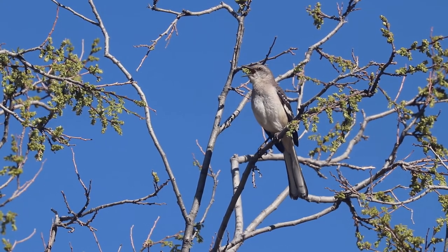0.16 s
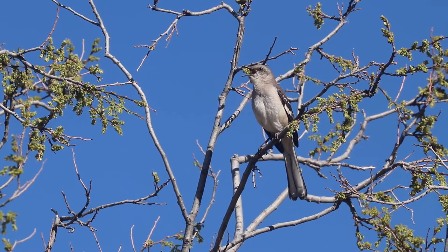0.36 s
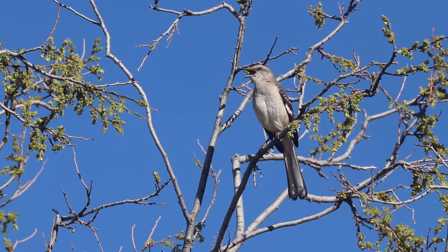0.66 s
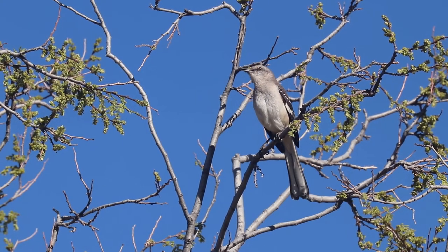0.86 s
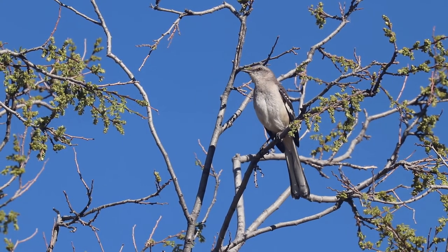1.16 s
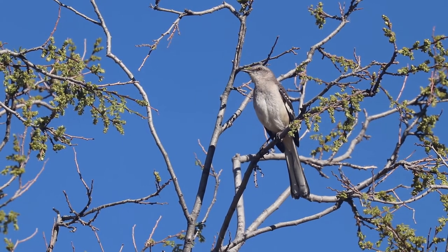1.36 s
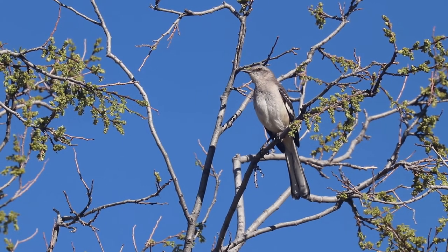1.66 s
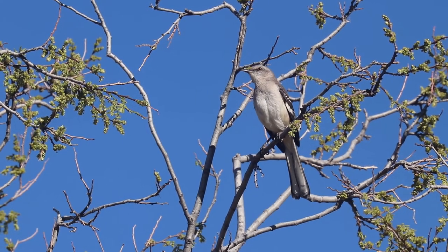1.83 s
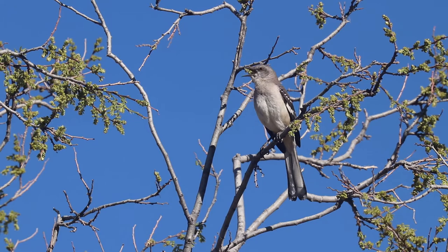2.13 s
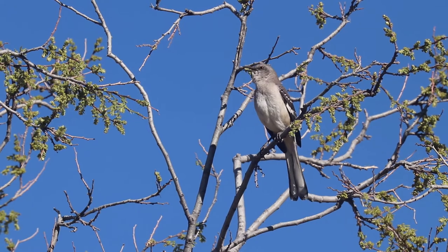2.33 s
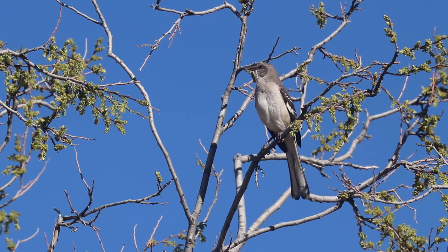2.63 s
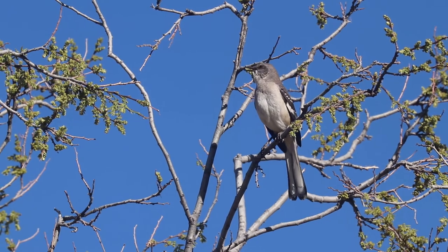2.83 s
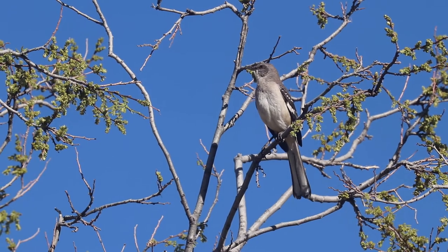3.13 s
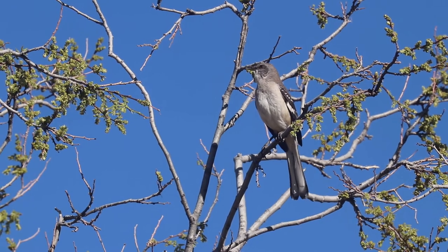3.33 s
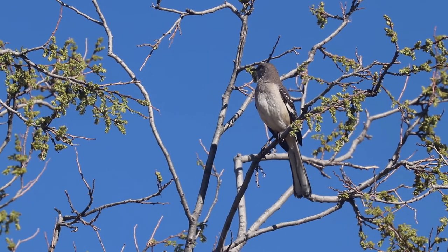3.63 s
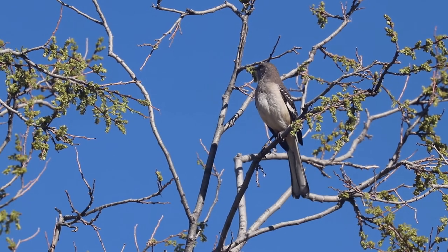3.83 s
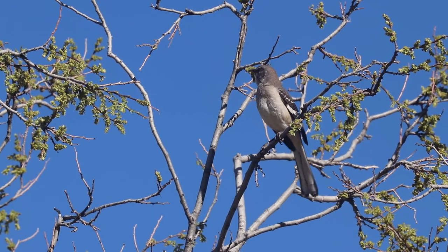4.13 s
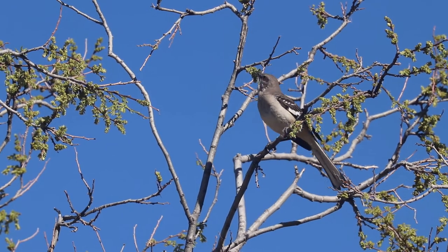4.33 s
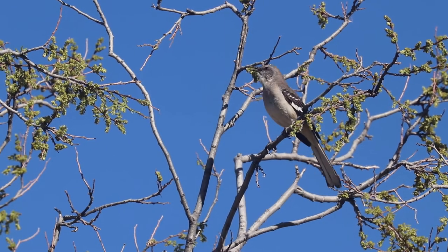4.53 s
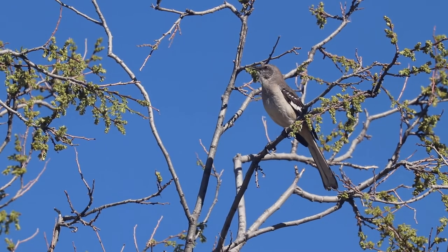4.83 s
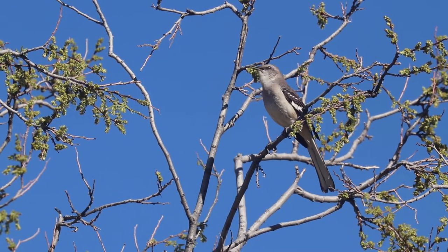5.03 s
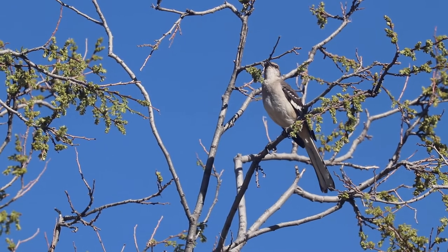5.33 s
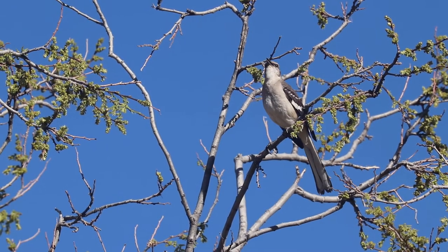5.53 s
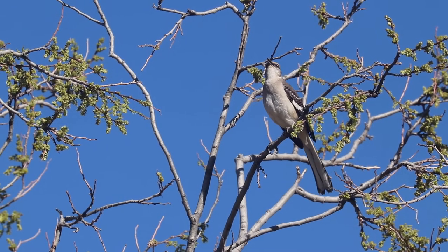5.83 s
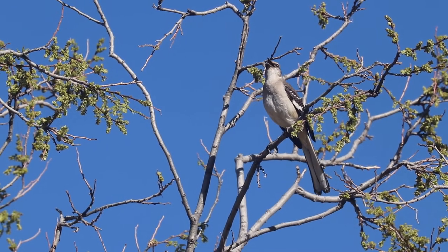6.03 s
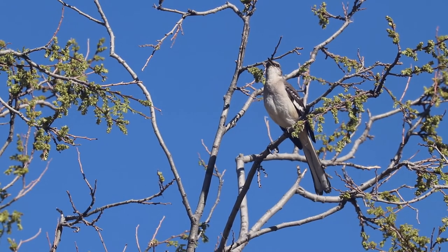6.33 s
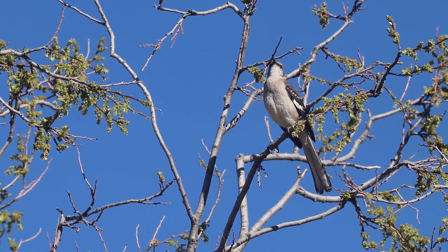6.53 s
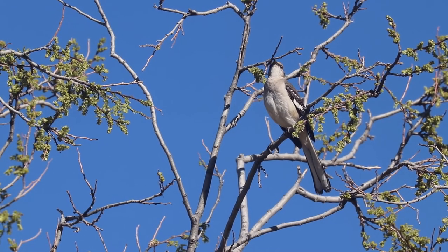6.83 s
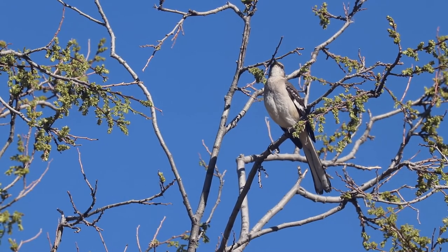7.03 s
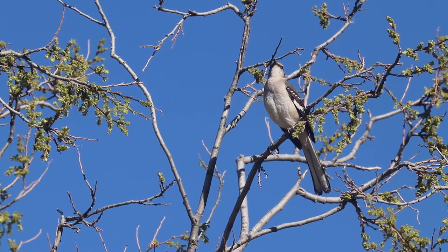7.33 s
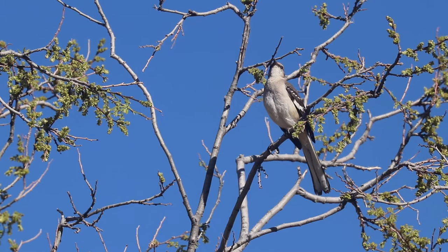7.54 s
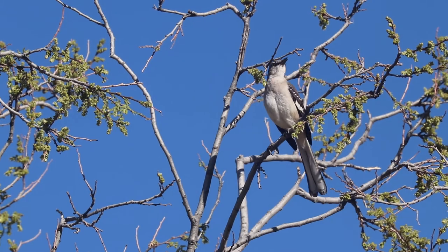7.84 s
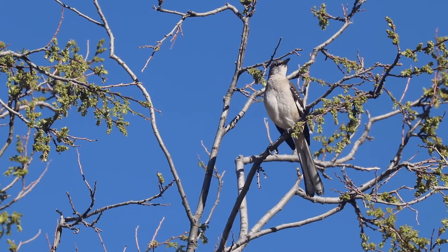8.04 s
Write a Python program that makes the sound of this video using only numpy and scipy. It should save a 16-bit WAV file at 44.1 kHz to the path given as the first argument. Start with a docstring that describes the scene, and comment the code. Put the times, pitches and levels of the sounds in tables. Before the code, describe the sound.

Clear mockingbird song changes from phrase to phrase with short pauses, heard on the left in still open air with a faint echo.

```python
"""Mockingbird in a canyon

A mockingbird's syrinx bends near-pure tones into loops, slurs, chucks, sweeps, trills and whistles,
and flutters them into buzzes. Branches scatter the song and a far canyon wall returns it faintly,
over still air and an opening puff of wind. One microphone feeds the left channel;
the right carries only the recorder's hiss."""
import sys
import numpy as np
from scipy import signal
from scipy.fft import rfft, irfft
from scipy.io import wavfile
from scipy.ndimage import uniform_filter1d

SR = 44100
rng = np.random.default_rng(int(sys.argv[2]) if len(sys.argv) > 2 else 0)


def unload_wav(signal):
    """Save mono or channel-first audio to the path in sys.argv[1] as 16-bit WAV at rate SR, clipped to [-1, 1]."""
    wavfile.write(
        sys.argv[1],
        SR,
        np.round(np.clip(np.atleast_2d(signal).T, -1, 1) * 32767).astype(np.int16),
    )


N = 360738
TIME = np.arange(N) / SR

# Arched notes: start t/s, end t/s, first f/Hz, middle f/Hz, last f/Hz, level/dB, crest position/0-1
HIGH_CHIP = (.176, .212, 1480, 2090, 1650, -34.5, .25)
LOW_CHIP = (.219, .257, 1420, 1830, 1440, -31, .53)
SLUR_LEAD_IN = (2.024, 2.052, 2300, 3180, 3130, -28.5, .54)
WHISTLES = [(1.93, 2.03, 2480, 2490, 2480, -64, .6), (3.865, 3.9, 1380, 1950, 1560, -39, .58),
            (3.907, 3.935, 1480, 2000, 1480, -36.5, .42), (3.948, 3.977, 1560, 1870, 1420, -38, .38),
            (4.01, 4.1, 3150, 3080, 3200, -58, .65), (4.985, 5.03, 2450, 2220, 2340, -41, .5),
            (5.028, 5.107, 2330, 2800, 2690, -31, .88), (5.969, 6.034, 2180, 2147, 2165, -21.2, .56),
            (6.239, 6.294, 2460, 2150, 2050, -24.5, .7), (7.669, 7.695, 2780, 2250, 1380, -31, .48),
            (8.142, 8.195, 2280, 1950, 1930, -32.5, .42)]
SECOND_VOICE = [(4.975, 5.072, 1520, 1720, 2180, -39, .5), (7.685, 7.699, 4300, 3100, 2400, -46, .62),
                (8.168, 8.19, 2550, 2720, 2600, -36, .55)]  # the other side of the syrinx sings along with a whistle
# A long whistle climbs, drops and holds: t/s, f/Hz, level/dB
LONG_WHISTLE = [(7.698, 2080, -70), (7.704, 2410, -32), (7.735, 2840, -27.3), (7.77, 3040, -28.5),
                (7.781, 2470, -27.5), (7.793, 2030, -25.5), (7.815, 2255, -31.5), (7.847, 2278, -34.5),
                (7.912, 2255, -35), (7.94, 2490, -70)]
# Upslurs: start t/s, end t/s, knee f/Hz, last f/Hz, level/dB, crest position/0-1
RISES = [(.339, .374, 2450, 4250, -31, .7), (.467, .543, 3000, 4700, -26.3, .44),
         (.624, .661, 2480, 4380, -28.7, .68), (.762, .826, 2800, 4580, -26.2, .49)]
# Loops: start t/s, snap t/s, low f/Hz, sinking t/s, level/dB before the throat
LOOPS = [(.374, .4325, 2290, .0142, -23), (.6615, .72, 2390, .0098, -22)]
# Slurs: start t/s, turn t/s, end t/s, first f/Hz, low f/Hz, last f/Hz, settling t/s, level/dB, accent/dB
SLURS = [(2.0553, 2.094, 2.14, 3850, 2590, 3020, .004, -30.8, -27.5),
         (2.1452, 2.194, 2.22, 3600, 2580, 3060, .0082, -33, -24.5),
         (2.2232, 2.277, 2.295, 4050, 2590, 2290, .0068, -37.5, -22.5)]
# Chucks: start t/s, flick t/s, held f/Hz, fundamental level/dB, octave level/dB, flick top f/Hz
CHUCKS = [(2.368, 2.39, 1195, -54, -38.5, 2730), (2.412, 2.442, 1335, -49.5, -31.5, 3160),
          (2.464, 2.5004, 1321, -52, -32, 3150), (2.524, 2.559, 1328, -52.5, -33.5, 3100),
          (2.586, 2.622, 1220, -51.5, -37, 2750), (2.861, 2.881, 1200, -54, -42, 2610),
          (2.904, 2.935, 1345, -51, -37, 3170), (2.963, 2.994, 1375, -50, -39.5, 3000),
          (3.024, 3.061, 1387, -47, -44.5, 3000), (3.388, 3.4094, 1376, -47.5, -53, 2060),
          (3.431, 3.463, 1370, -47, -45.5, 2880), (3.486, 3.523, 1368, -47, -41.5, 3150),
          (3.554, 3.59, 1330, -49.5, -40, 3170)]
# Sweeps: start t/s, end t/s, knee f/Hz, top f/Hz, level/dB
SWEEPS = [(4.062, 4.119, 2620, 3060, -27.3), (4.134, 4.1985, 2640, 3080, -27.3),
          (4.217, 4.291, 2510, 3020, -27.5), (4.318, 4.386, 2420, 2850, -28),
          (4.415, 4.4855, 2450, 2880, -29), (4.568, 4.629, 2560, 2600, -28),
          (4.646, 4.7125, 2470, 2780, -28), (4.741, 4.801, 2680, 2950, -29.3)]
# Trill notes: start t/s, turn t/s, f/Hz, level/dB
TRILL = [(5.116, 5.1264, 2970, -32.5), (5.142, 5.152, 3080, -32.5), (5.168, 5.177, 2870, -33),
         (5.194, 5.204, 2780, -32.5), (5.22, 5.23, 2770, -32), (5.246, 5.255, 2630, -31.5),
         (5.518, 5.528, 2700, -33.5), (5.546, 5.5547, 2870, -30), (5.572, 5.582, 2820, -30),
         (5.599, 5.609, 2890, -31), (5.628, 5.638, 2840, -30.5), (5.656, 5.6665, 2750, -31),
         (5.685, 5.696, 2710, -31.5), (5.713, 5.724, 2720, -30.5), (5.743, 5.754, 2720, -31),
         (5.773, 5.7845, 2670, -31.5), (5.8, 5.811, 2670, -32), (5.826, 5.8355, 2400, -35)]
# Buzzes: arched-note columns, first and last flutter f/Hz, first and last swing f/Hz, throb depth/0-1
BUZZES = [(6.026, 6.208, 3080, 2860, 2620, -33.7, .36, 238, 186, 90, 330, .55),
          (6.291, 6.407, 2760, 3085, 2740, -29.4, .62, 196, 204, 110, 160, .13)]
# Rough calls: t/s, f/Hz, level/dB before the throat, flutter f/Hz, swing f/Hz, throb depth/0-1
RASP = [(.024, 2000, -68, 120, 420, .1), (.033, 2084, -44, 119.3, 515, 0), (.065, 2080, -45, 125, 460, .1),
        (.11, 2020, -46, 129, 450, .1), (.124, 1800, -58, 128, 300, .1)]
CHATTER = [(4.964, 2835, -45, 174, 282, 0.89), (4.98, 2683, -38.5, 252, 380, 1),
           (4.997, 2595, -38, 385, 380, 0.65), (5.012, 3050, -44, 428, 200, .4),
           (5.03, 3300, -53, 430, 80, 0.18), (5.04, 3300, -75, 430, 80, .2)]  # a scratchy run of quickening pulses
# Timbres: gain/dB of each harmonic, from the fundamental up; a strong octave makes the chips nasal
HIGH_CHIP_TONE = [-9.5, -1, -15.5, -17, -29]
LOW_CHIP_TONE = [-16, 0, -33, -26, -30]
LOOP_TONE = [-0.5, -16.5, -26, -33]
RISE_TONE = [0, -21.5, -30, -36]
SLUR_TONE = [0, -23.5, -31.5]
PURE_TONE = [0, -39.5, -48]
SECOND_VOICE_TONE = [0, -24]
RASP_TONE = [1, 7, -2, -5]
# Early reflections off the branches: delay t/s, level/dB
BRANCHES = [(.004, -21), (0.0094, -15.5), (0.0265, -24.5)]
# Envelope of a puff of wind on the microphone: t/s, level/dB
PUFF = [(0, -48), (.1, -51), (.2, -56), (.4, -54), (.5, -69), (1.2, -72), (3.5, -102), (4, -100)]
# Noise colours of still air and the recorder's hiss: f/Hz, relative level/dB
AIR = [(10, -12.5), (25, -9.5), (40, 0), (52, 0.5), (70, -13), (140, -12.5), (165, -7.5), (190, -12.5),
       (650, -15.5), (760, -11.5), (880, -17.5), (3000, -17.5), (6000, -20.5), (13000, -20)]
HISS = [(10, 1), (40, 0.5), (130, -1), (500, -3), (1500, -5.5), (6000, -7), (13000, -7.5)]


def mockingbird():
    """The lead voice: every syllable of the song, laid dry on one track."""
    syllables = [arched(HIGH_CHIP, HIGH_CHIP_TONE, taper=.9), arched(LOW_CHIP, LOW_CHIP_TONE),
                 arched(SLUR_LEAD_IN, SLUR_TONE, taper=2.2), long_whistle(),
                 scratch(RASP, RASP_TONE, trim_db=.1, width_hz=650, unsteady=.044, jitter=.026, shimmer=.3),
                 scratch(CHATTER, PURE_TONE, trim_db=-.6, width_hz=2500,
                         unsteady=.082, jitter=.036, shimmer=.35)]
    syllables += [arched(row, PURE_TONE) for row in WHISTLES]
    syllables += [arched(row, SECOND_VOICE_TONE) for row in SECOND_VOICE]
    for sing, rows in [(rise, RISES), (loop, LOOPS), (slur, SLURS), (chuck, CHUCKS),
                       (sweep, SWEEPS), (trill_note, TRILL), (buzz, BUZZES)]:
        syllables += [sing(*row) for row in rows]
    song = np.zeros(N)
    for t, sound in syllables:
        song[np.rint(t * SR).astype(int)] += sound
    return song


def syrinx(t, hz, harmonics, jitter=.0056, shimmer=.033):
    """The bird's oscillator, wavering in pitch and level; harmonics holds each partial's rms envelope."""
    phase = 2 * np.pi * np.cumsum(hz * (1 + jitter * tremor(t))) / SR
    tone = sum(env * np.sin(k * phase) * (k * hz < SR / 2) for k, env in enumerate(harmonics, 1))
    fades = signal.windows.tukey(len(t), min(1, 80 / len(t)))
    return np.sqrt(2) * tone * (1 + shimmer * tremor(t)) * fades


def throat(hz, width_hz, centre_hz=3450):
    """The gain of the throat's resonance for a partial."""
    return 1 / np.hypot(1, (hz - centre_hz) / width_hz)


def note(t, hz, env, tone, throat_hz=1000, purity_db=0):
    """A glide, purer by purity_db per octave above its median; below throat_hz the overtones gain."""
    mistuned = np.clip((throat_hz / hz) ** 9, 1, 10)
    brightness = amp(-purity_db * np.maximum(np.log2(hz / np.median(hz)), 0))
    fundamental = env * amp(tone[0]) / mistuned ** .42
    overtones = [env * brightness * amp(db) * mistuned ** (1 / k) for k, db in enumerate(tone[1:], 1)]
    return t, syrinx(t, hz, [fundamental] + overtones)


def arched(row, tone, taper=1.45):
    """A chip or whistle: one bend of pitch under one swell."""
    start, end, first_hz, middle_hz, last_hz, db, crest = row
    t, u = progress(start, end)
    return note(t, arch(u, first_hz, middle_hz, last_hz), amp(db) * swell(u, crest, taper), tone)


def long_whistle():
    """A near-pure tone rides its pitch and level curves."""
    times, hz, db = np.transpose(LONG_WHISTLE)
    t = span(times[0], times[-1])
    return note(t, glide(t, times, hz), glide(t, times, amp(db)), PURE_TONE)


def rise(start, end, knee_hz, last_hz, db, crest, from_hz=1300, leap_s=.012):
    """An upslur: a quick leap to the knee on top of a steady climb."""
    t, u = progress(start, end)
    leap_hz = (from_hz - knee_hz) * np.exp(-((t - start) / leap_s) ** 2)
    hz = knee_hz + leap_hz + (last_hz - knee_hz) * u
    return note(t, hz, amp(db) * swell(u, crest, taper=1.8), RISE_TONE, throat_hz=2400, purity_db=22)


def loop(start, snap, low_hz, sink_s, db):
    """The pitch sinks, holds, then snaps up and back, flaring as it crosses the throat's resonance."""
    top_hz, snap_s, curve, sag_db_per_s = 4450, .0052, 1.55, 62
    t = span(start, snap + .012)
    tension = np.exp(-abs((t - start) / sink_s) ** curve) + np.exp(-abs((t - snap) / snap_s) ** curve)
    hz = low_hz + (top_hz - low_hz) * tension
    env = amp(db - sag_db_per_s * (t - start)) * throat(hz, width_hz=350)
    env *= gate(t, attack_s=.002, release_s=.006)
    return note(t, hz, env, LOOP_TONE, throat_hz=2350, purity_db=16)


def slur(start, turn, end, first_hz, low_hz, last_hz, settle_s, db, accent_db):
    """An accented attack relaxes to a low pitch, which later bends to another."""
    turn_s, accent_at_s, accent_s = .0055, .0052, .0042
    t = span(start, end)
    fall_hz = (first_hz - low_hz) * np.exp(-(t - start) / settle_s)
    bend_hz = (last_hz - low_hz) / (1 + np.exp((turn - t) / turn_s))
    accent = amp(accent_db) * np.exp(-((t - start - accent_at_s) / accent_s) ** 2)
    env = (amp(db) + accent) * gate(t, attack_s=.004, release_s=.013)
    return note(t, low_hz + fall_hz + bend_hz, env, SLUR_TONE, purity_db=56)


def chuck(start, flick, pitch_hz, low_db, octave_db, top_hz):
    """The throat rings a low note's octave; an upward flick takes the fundamental through that ring."""
    scoop, sag, flick_s, flick_db = .965, .988, .009, -36
    times = np.r_[start + (flick - start) * np.array([0, .15, .6, .88]),
                  flick + np.linspace(0, flick_s, 5)]
    t = span(start, times[-1])
    held_hz = pitch_hz * np.array([.98 * scoop, scoop, 1, sag])
    flick_hz = pitch_hz + (top_hz - pitch_hz) * np.array([.07, .24, .52, .82, 1])
    hz = glide(t, times, np.r_[held_hz, flick_hz])
    fundamental_db = np.r_[low_db + np.array([-12, -5, 1, -1, 3]), flick_db + np.array([-8, 1, -2, -25])]
    fundamental = glide(t, times, amp(fundamental_db))
    octave = glide(t, times, amp(octave_db + np.array([-5.5, -6.5, 1, 4, 1, -20, -37, -45, -60])))
    return t, syrinx(t, hz, [fundamental, octave, amp(-31.5) * octave])


def sweep(start, end, knee_hz, top_hz, db):
    """The pitch climbs to a knee and flicks to the top; the level grows until it passes full_hz."""
    from_hz, curve, full_hz, db_per_octave = 1530, 1.12, 2200, 39
    flick_lead_s, flick_s = .0075, .0013
    t, u = progress(start, end)
    flick = 1 / (1 + np.exp((end - flick_lead_s - t) / flick_s))
    hz = from_hz * (knee_hz / from_hz) ** (u ** curve) + (top_hz - knee_hz) * flick
    env = amp(db - db_per_octave * np.maximum(np.log2(full_hz / hz), 0))
    return note(t, hz, env * gate(t, attack_s=.012, release_s=.007), PURE_TONE)


def trill_note(start, turn, pitch_hz, db, climb=.028):
    """A sharp attack, a short rise, then the pitch falls away."""
    times = np.r_[start + np.array([0, .0021, .0049]), turn + np.array([-.001, .0011, .0036, .0083])]
    t = span(start, times[-1])
    held_hz = pitch_hz * np.array([.76, 1 - climb, 1, 1 + 2 * climb])
    hz = glide(t, times, np.r_[held_hz, 2500, 2000, 1550])
    drop_db = rng.normal(-9.5, 3)
    env = glide(t, times, amp(db + np.array([-26, 1.8, 0, 0, -2, drop_db, -42])))
    return t, syrinx(t, hz, [env * amp(gain_db) for gain_db in PURE_TONE])


def buzz(start, end, first_hz, middle_hz, last_hz, db, crest,
         first_rate_hz, last_rate_hz, first_swing_hz, last_swing_hz, depth):
    """An arched note whose flutter widens as it goes."""
    t, u = progress(start, end)
    rate_hz = np.linspace(first_rate_hz, last_rate_hz, len(t))
    swing_hz = np.linspace(first_swing_hz, last_swing_hz, len(t))
    hz = arch(u, first_hz, middle_hz, last_hz)
    hz, env = flutter(t, hz, amp(db) * swell(u, crest, taper=1), rate_hz, swing_hz, depth, unsteady=.13)
    return t, syrinx(t, hz, [env * amp(gain_db) for gain_db in PURE_TONE], jitter=.014, shimmer=.13)


def scratch(rows, tone, trim_db, width_hz, unsteady, jitter, shimmer):
    """A rough, wide flutter whose partials swing in and out of the throat's resonance."""
    times, pitch_hz, db, rate_hz, swing_hz, depth = np.transpose(rows)
    t = span(times[0], times[-1])
    curves = [glide(t, times, points) for points in (pitch_hz, amp(db + trim_db), rate_hz, swing_hz, depth)]
    hz, env = flutter(t, *curves, unsteady)
    harmonics = [env * amp(gain_db) * throat(k * hz, width_hz) for k, gain_db in enumerate(tone, 1)]
    return t, syrinx(t, hz, harmonics, jitter, shimmer)


def flutter(t, hz, env, rate_hz, swing_hz, depth, unsteady):
    """Fast vibrato with a locked tremolo: the note is loudest on each downward swing."""
    cycle = 2 * np.pi * np.cumsum(rate_hz * (1 + unsteady * tremor(t))) / SR
    return hz + swing_hz * np.sin(cycle), env * (1 - np.clip(depth, 0, 1) * np.cos(cycle))


def tremor(t, window=160):
    """A quick random waver of rms 1."""
    return unit_rms(np.convolve(rng.standard_normal(len(t) + window - 1), np.hanning(window), "valid"))


def glide(t, times, values):
    """A breakpoint curve whose corners are rounded, as muscles move."""
    return uniform_filter1d(np.interp(t, np.maximum.accumulate(times), values), size=70, mode="nearest")


def arch(u, first_hz, middle_hz, last_hz):
    """A smooth bend through three pitches."""
    return np.polyval(np.polyfit([0, .5, 1], [first_hz, middle_hz, last_hz], 2), u)


def swell(u, crest, taper):
    """Grows to 1 at the crest and dies away; more taper softens the ends."""
    skewed = np.interp(u, [0, np.clip(crest, .02, .98), 1], [0, .5, 1])
    return np.abs(np.sin(np.pi * skewed)) ** taper


def gate(t, attack_s, release_s):
    """Attack, hold, release."""
    return np.minimum((t - t[0]) / attack_s, 1) * np.minimum((t[-1] - t) / release_s, 1)


def span(start, end):
    """The sample times between two moments."""
    return TIME[max(int(start * SR), 0):int(end * SR)]


def progress(start, end):
    """A note's sample times t, and the position u along it (0-1)."""
    t = span(start, end)
    return t, np.clip((t - start) / (end - start), 0, 1)


def amp(db):
    """Decibels to linear gain."""
    return 10 ** (np.asarray(db) / 20)


def unit_rms(x):
    """Levels a signal to rms 1."""
    return x / np.sqrt(np.mean(x ** 2) + 1e-20)


def canyon(song):
    """The reverb: returns from the branches, the tree's crown, the slopes and a far wall."""
    branches = sum(amp(db) * np.interp(TIME - delay_s, TIME, song) for delay_s, db in BRANCHES)
    crown = amp(-15) * scatter(song, delay_s=.001, t60_s=.07)
    slopes = amp(-28) * scatter(song, delay_s=.018, t60_s=.42)
    wall = amp(-46) * scatter(song, delay_s=.8, t60_s=1.2)
    return branches + crown + slopes + wall


def scatter(x, delay_s, t60_s):
    """A cloud of small reflections that starts after a pre-delay and dies away."""
    taps = rng.standard_normal(SR) * (rng.random(SR) < .15) * amp(-60 * TIME[:SR] / t60_s)
    response = np.r_[np.zeros(int(delay_s * SR)), taps / np.linalg.norm(taps)]
    return signal.fftconvolve(x, response)[:N]


def wind_puff():
    """Wind on the microphone: a low rumble that soon fades."""
    rumble = noise([(5, 2), (30, -4), (55, -10), (110, -28), (400, -69), (2000, -90)])
    return rumble * amp(np.interp(TIME, *np.transpose(PUFF)))


def noise(spectrum):
    """A steady noise bed of rms 1, coloured by points of f/Hz, relative level/dB."""
    hz, db = np.transpose(spectrum)
    colour = amp(np.interp(np.log(np.fft.rfftfreq(N, 1 / SR) + 1), np.log(hz), db))
    return unit_rms(irfft(rfft(rng.standard_normal(N)) * colour, N))


def scene():
    """The mix: bird, canyon, still air and wind on the left, hiss alone on the right."""
    song = mockingbird()
    wind = wind_puff()
    left = song + canyon(song) + amp(-57.5) * noise(AIR) + wind
    return np.array([left, amp(-57) * noise(HISS)])


def record(dry, cutoff_hz=13230):
    """The recorder's band limit: a steep low-pass."""
    lowpass = signal.firwin(601, cutoff_hz, window=("kaiser", 8), fs=SR)
    return signal.oaconvolve(dry, lowpass[None], "same")


dry = scene()
out = record(dry)
unload_wav(out)
```